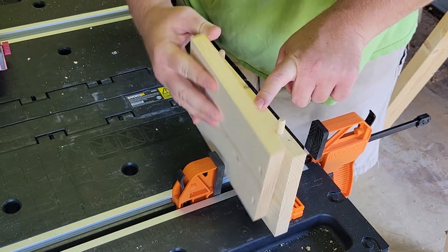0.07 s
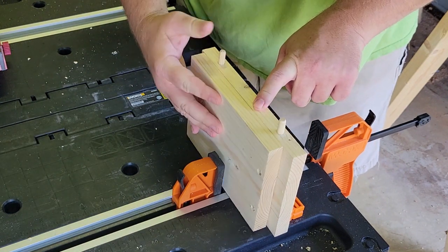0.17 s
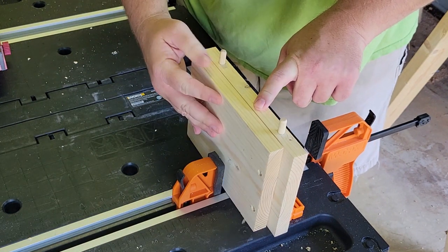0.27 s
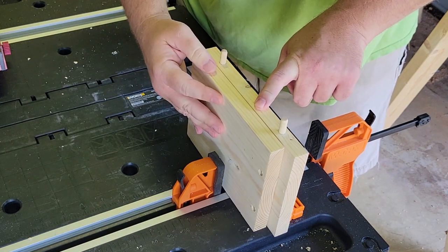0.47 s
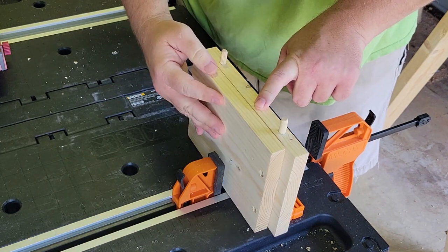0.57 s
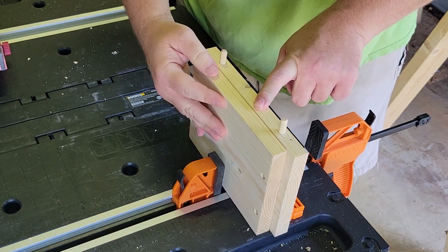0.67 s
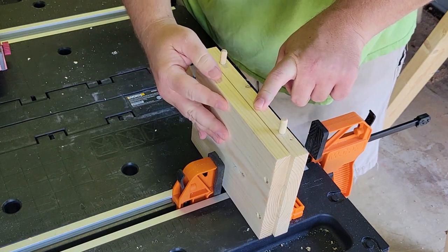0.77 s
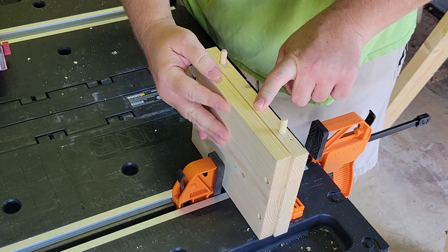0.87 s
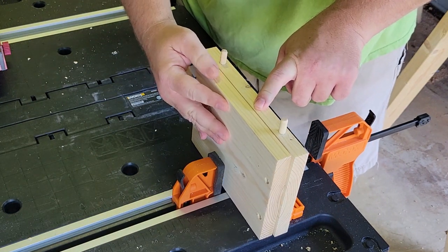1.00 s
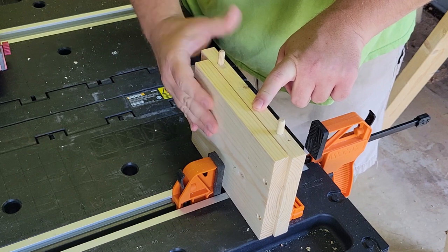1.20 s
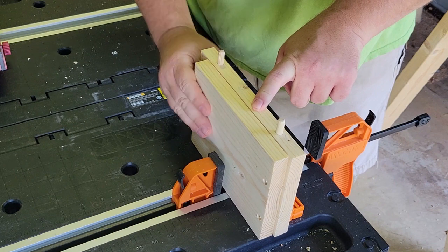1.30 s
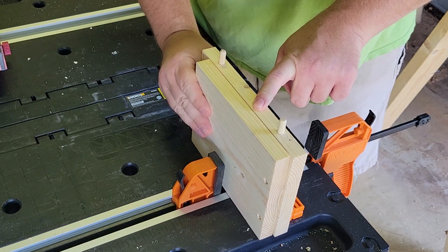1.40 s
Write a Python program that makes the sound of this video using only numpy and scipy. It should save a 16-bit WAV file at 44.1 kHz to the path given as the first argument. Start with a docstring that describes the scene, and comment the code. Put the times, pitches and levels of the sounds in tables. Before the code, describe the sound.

Wood knocks dully on wood after a short dry slide, in a small workshop.

```python
"""Ventilation rumbles and hisses faintly; a soft bump, then a wooden board slides down the face of a second
board clamped on a plastic work table. It taps lightly, knocks down on one corner, lands flat with a duller,
heavier knock and settles; fingers brush the wood later. Knocks are minimum-phase pulses, grit bursts and
decaying sines; friction and air are shaped noise; echoes and a diffuse noise tail make the small workshop."""
import sys
import numpy as np
from scipy import signal
from scipy.fft import rfft, irfft
from scipy.io import wavfile
from scipy.ndimage import uniform_filter1d

SR = 44100
rng = np.random.default_rng(int(sys.argv[2]) if len(sys.argv) > 2 else 0)


def log_audio(samples):
    """Write samples as a 16-bit WAV file to the path given in sys.argv[1]."""
    # one column per channel
    frames = np.atleast_2d(samples).T
    # limit to full scale, then quantise
    limited = np.clip(frames, -1, 1)
    pcm = np.round(limited * 32767).astype(np.int16)
    wavfile.write(sys.argv[1], SR, pcm)


N = 63945
TIME, FREQ = np.arange(N) / SR, np.fft.rfftfreq(N, 1 / SR)

# Spectrum of the dead knock of wood on wood. Each row: frequency in Hz, relative level in dB.
BLOW_COLOUR = [(22, -9.5), (60, 5), (130, 13), (200, 24), (310, 28), (480, 29.5), (700, 27.5), (1100, 20),
               (1750, 11.5), (2400, 7.5), (3100, 6), (3900, -1.5), (5600, -11.5), (8000, -26.5),
               (15500, -28)]
# Modes of the boards and the table. Each row: frequency in Hz, relative level in dB, T60 in seconds.
WOOD_MODES = [(88.16, -29.5, .3), (118, -32.5, 0.38), (175, -30, 0.22), (186, -32, 0.29), (213.6, -35, .45),
              (287, -19, .44), (344, -21, .38), (460, -22, .42), (418, -29, .3), (565, -31, .28),
              (607, -30, .2), (662, -26, .26), (682, -26, .26), (778, -26, .18), (834, -27, .16),
              (899, -35, .25), (1037, -28, .16), (1150, -31, .22), (1355, -30, .24), (1492, -35, .2),
              (2558, -32.5, .12), (3264, -33, 0.0847), (274.5, -23.5, 0.23)]
# Stereo likeness of diffuse sound. Each row: frequency in Hz, left-right correlation (no unit).
DIFFUSE_LIKENESS = [(100, .97), (300, .95), (650, .87), (1200, .35), (2500, .05), (12000, .15)]


def amp(db):
    """Decibels to gain."""
    return 10 ** (np.asarray(db) / 20)


def unit(x):
    """Scales to rms 1."""
    return x / np.sqrt(np.mean(x ** 2) + 1e-20)


def read(points, hz):
    """Interpolates a table on a log-frequency axis."""
    f, value = np.transpose(points)
    return np.interp(np.log(hz + 1), np.log(f), value)


def delayed(x, delay_s):
    """Shifts x later by delay_s, cut to the scene length."""
    pad = np.zeros(x.shape[:-1] + (max(round(delay_s * SR), 0),))
    return np.concatenate([pad, x], axis=-1)[..., :N]


def smooth_noise(window_samples):
    """Slow random curve of rms 1: white noise under a moving average."""
    return unit(uniform_filter1d(rng.standard_normal(N), window_samples))


def noise(gain, likeness):
    """Stereo noise of rms 1 with a given spectrum; mid and side weights set its left-right correlation."""
    mid, side = rfft(rng.standard_normal((2, N)))
    same = np.clip(read(likeness, FREQ), -1, 1)
    mid = mid * np.sqrt(1 + same)
    side = side * np.sqrt(1 - same)
    return unit(irfft(np.array([mid + side, mid - side]) * gain, N))


def click(spectrum_db):
    """Minimum-phase pulse: folding the cepstrum packs the energy as early as the spectrum allows."""
    cepstrum = irfft(np.log(amp(spectrum_db)), N)
    cepstrum[1:] *= 2
    cepstrum[N // 2:] = 0
    return irfft(np.exp(rfft(cepstrum)), N)


def decay(time_s, t60_s):
    """Exponential decay, 60 dB down after t60_s."""
    return np.exp(-np.log(1000) * time_s / t60_s)


def ventilation():
    """A sine hum of wavering pitch in a narrow band of rumble, under broadband hiss."""
    # Hiss spectrum. Each row: frequency in Hz, relative level in dB.
    air_colour = [(20, -28.5), (40, -11.5), (60, -12.5), (110, -10), (160, -22.5), (220, -22.5), (400, -28),
                  (550, -28), (1150, -26.5), (1500, -31.5), (2300, -35), (2850, -29), (3700, -39),
                  (4700, -42.5), (6200, -38.5), (7000, -35.5), (7750, -29.5), (8500, -48.5), (10000, -58.5),
                  (16000, -57)]
    # Stereo likeness. Each row: frequency in Hz, left-right correlation (no unit).
    air_likeness = [(130, 0.96), (290, 0.74), (640, .4), (1400, -0.26), (3100, -.1), (6800, 0.28),
                    (9000, .7), (15000, 0.61)]
    rumble_hz, half_width_hz = 77, 18
    waver_rms_hz, waver_window_s = 1.2, 0.061
    hum_db, rumble_db, hiss_db = -52.5, -54, -55

    hz = rumble_hz + waver_rms_hz * smooth_noise(int(waver_window_s * SR))
    hum = np.sin(2 * np.pi * np.cumsum(hz) / SR)
    rumble = noise(1 / (1 + ((FREQ - rumble_hz) / half_width_hz) ** 2), air_likeness)
    hiss = noise(amp(read(air_colour, FREQ)), air_likeness)
    return amp(hum_db) * hum + amp(rumble_db) * rumble + amp(hiss_db) * hiss


def handling():
    """A soft bump: a decaying sine at the strongest mode's frequency, with a short dull scuff of noise."""
    start_s, rise_s, t60_s = 0.003, 0.0017, 0.27
    level_db, scuff_re_sine_db = -39, -8.5

    hz = max(WOOD_MODES, key=lambda row: row[1])[0]
    age_s = np.maximum(TIME - start_s, 0)
    # Half the blow's dB contour, with the treble rolled off
    colour = amp(read(BLOW_COLOUR, FREQ) / 2) / (1 + (FREQ / 6000) ** 4)
    scuff = amp(scuff_re_sine_db) * noise(colour, DIFFUSE_LIKENESS)
    envelope = np.minimum(age_s / rise_s, 1) * decay(age_s, t60_s)
    return amp(level_db) * envelope * (np.sin(2 * np.pi * hz * age_s) + scuff)


def rubbing():
    """Friction: grainy resonant hiss of board on board and of fingers on wood, with a dull body for fingers."""
    # Board sliding on board. Each row: time in seconds, hiss level in dB.
    slide_levels = [(0, -55), (.045, -63), (.085, -50), (.12, -47.5), (.165, -45), (.205, -48), (.26, -58),
                    (.29, -70)]
    # Hiss spectrum. Each row: frequency in Hz, relative level in dB.
    rub_colour = [(100, -13.5), (400, 3), (650, -7), (900, 4), (1400, -7.5), (3000, 0), (4500, -4.5),
                  (7500, -7), (10000, -6.5), (11300, -15), (12500, -11.5), (15500, -10.5)]
    # Resonances woken by rubbing. Each row: frequency in Hz, width in Hz, boost in dB.
    rub_peaks = [(1040, 60, 9), (1850, 150, 9), (2690, 80, 11), (2950, 100, 13), (5240, 90, 15),
                 (5950, 180, 10), (8970, 250, 6)]
    # Fingers shift their grip. Each row: centre in seconds, 1/e half length in seconds,
    # hiss level in dB, dull body level in dB.
    finger_strokes = [(0.66, .06, -84, -58.5), (0.835, 0.08, -66.5, -59), (1.412, 0.077, -68.5, -89)]
    grain_rms_db, grain_window_s = 1.5, 0.0022
    body_hz, body_half_width_hz = 212, 200

    colour_db = read(rub_colour, FREQ)
    for hz, width_hz, boost_db in rub_peaks:
        colour_db = colour_db + boost_db / (1 + (2 * (FREQ - hz) / width_hz) ** 2)
    grain = smooth_noise(max(int(grain_window_s * SR), 1))
    # Silent after the last slide row
    hiss_gain = amp(np.interp(TIME, *np.transpose(slide_levels), right=-np.inf))
    body_gain = np.zeros(N)
    for centre_s, half_s, hiss_db, body_db in finger_strokes:
        stroke = np.exp(-((TIME - centre_s) / half_s) ** 2)
        hiss_gain = hiss_gain + amp(hiss_db) * stroke
        body_gain = body_gain + amp(body_db) * stroke
    body = noise(1 / (1 + ((FREQ - body_hz) / body_half_width_hz) ** 2), DIFFUSE_LIKENESS)
    hiss = amp(grain_rms_db * grain) * noise(amp(colour_db), DIFFUSE_LIKENESS)
    return hiss_gain * hiss + body_gain * body


def echoes(x):
    """Direct sound plus single reflections from the table and near things."""
    # Each row: left delay in seconds, right delay in seconds, level in dB.
    reflections = [(.0027, 0.0027, -21.5), (.0060, 0.0079, -12), (.0087, .0085, -17), (.0142, .0145, -17),
                   (0.018, 0.015, -13)]
    total = x
    for left_s, right_s, db in reflections:
        total = total + amp(db) * np.array([delayed(x, left_s), delayed(x, right_s)])
    return total


def workshop(x):
    """Diffuse room: convolution with a noise tail of evened colour, each band dying at its own speed."""
    # Decay. Each row: frequency in Hz, T60 in seconds.
    room_t60 = [(80, .5), (250, .48), (500, .43), (1000, .41), (3000, .39), (7000, .39), (10000, .32),
                (14000, .27)]
    # Tail spectrum. Each row: frequency in Hz, level in dB.
    room_colour = [(60, 2), (170, 4), (300, 2), (600, -2), (1200, 2), (2500, 1), (6000, 4), (14000, 4)]
    delay_s, build_s, even_hz = 0.0011, 0.005, 14

    hz, frame_s, z = signal.stft(noise(1, DIFFUSE_LIKENESS), SR, nperseg=512)
    z = z * decay(frame_s, read(room_t60, hz)[:, None])
    spectrum = rfft(signal.istft(z, SR, nperseg=512)[1][:, :N])
    # Even out the power in even_hz bands before colouring
    power = uniform_filter1d((abs(spectrum) ** 2).mean(0), max(int(even_hz * N / SR), 1))
    tail = irfft(spectrum / np.sqrt(power) * amp(read(room_colour, FREQ)), N)
    tail *= np.clip((TIME - delay_s) / build_s, 0, 1)
    tail *= TIME < TIME[-1] / 2
    return signal.fftconvolve(x[None], tail, axes=1)[:, :N]


def bass(hz, db):
    """Bass shelf of one contact: lifts or lowers the lows of its knock."""
    return db / (1 + (hz / 520) ** 2)


def crunch():
    """Grit as two rough faces meet: a brief noise burst with the energy of a pulse of the same spectrum."""
    # Spectrum. Each row: frequency in Hz, relative level in dB.
    crunch_colour = [(200, -29), (1000, -4.5), (2000, 9), (3100, 9), (3900, 0), (5600, -1), (8000, -9.5),
                     (10000, -10), (11500, -16.5), (15500, -16)]
    # Stereo likeness. Each row: frequency in Hz, left-right correlation (no unit).
    crunch_likeness = [(1000, 0.71), (3000, .5), (12000, .55)]
    rise_s, fade_s = 0.0006, 0.0048

    burst = np.minimum(TIME / rise_s, 1) * np.exp(-TIME / fade_s)
    grit = amp(read(crunch_colour, FREQ))
    gain = np.sqrt(np.mean(grit ** 2) / np.sum(burst ** 2))
    return burst * gain * noise(grit, crunch_likeness)


def mode(hz, db, t60_s):
    """One dying vibration: a sine under exponential decay."""
    return amp(db) * decay(TIME, t60_s) * np.sin(2 * np.pi * hz * TIME)


def tap():
    """The edge touches lightly just before landing: one short, higher note on a faint blow and crunch."""
    start_s, note_hz, note_db, note_t60_s = 0.1977, 1250, -27, 0.013
    blow_db, crunch_db = -34.5, -21

    note = mode(note_hz, note_db, note_t60_s)
    blow = click(blow_db + read(BLOW_COLOUR, FREQ))
    return delayed(note + blow + amp(crunch_db) * crunch(), start_s)


def knocks():
    """Each contact gives a dead blow and a brief crunch, and sets the modes ringing."""
    # Contacts of the board. Each row: start in seconds, force in dB, bass lift in dB,
    # crunch in dB re force, ring in dB re force.
    contacts = [(0.2142, -5, 5, 2, -7.5), (0.2170, -11.5, -5, 7.5, -15), (0.2669, 0.5, -0.5, -5, 1),
                (0.2756, -15, 2, 6, -14.5), (0.3059, -14, 4.5, 5, -9)]
    ring_rise_s = 0.002

    blows, rings, crunches = np.zeros(N), np.zeros(N), np.zeros((2, N))
    # Successive table rows start with opposite sign
    bank = np.array([(-1) ** k * mode(*row) for k, row in enumerate(WOOD_MODES)])
    bank = bank * np.minimum(TIME / ring_rise_s, 1)
    modes_hz = np.array(WOOD_MODES)[:, 0]
    colour_db = read(BLOW_COLOUR, FREQ)
    for start_s, force_db, bass_db, crunch_db, ring_db in contacts:
        blows -= delayed(click(force_db + colour_db + bass(FREQ, bass_db)), start_s)
        crunches += amp(force_db + crunch_db) * delayed(crunch(), start_s)
        mode_gains = amp(force_db + ring_db + bass(modes_hz, bass_db))
        rings += delayed((mode_gains[:, None] * bank).sum(0), start_s)
    return blows, rings, crunches


def scene():
    """The tap and the knocks in the room, with friction, handling and ventilation."""
    ring_send_db, crunch_send_db, tap_send_db = -21.5, -1.5, 4

    blows, rings, crunches = knocks()
    touch = tap()
    room_send = blows + amp(ring_send_db) * rings
    room_send = room_send + amp(crunch_send_db) * crunches[0] + amp(tap_send_db) * touch[0]
    impacts = echoes(blows) + rings + crunches + touch
    return impacts + workshop(room_send) + rubbing() + handling() + ventilation()


def record(dry):
    """Treble tilted to the left microphone, a low cut, then a linear-phase band limit."""
    treble_left_db, treble_hz = 1.9, 14000.0
    low_cut_hz, edge_hz = 27.4, 15900

    lean_db = treble_left_db * FREQ ** 4 / (FREQ ** 4 + treble_hz ** 4)
    x = irfft(rfft(dry) * amp([lean_db, -lean_db]), N)
    x = signal.sosfilt(signal.butter(2, low_cut_hz, "high", fs=SR, output="sos"), x)
    band_limit = signal.firwin(401, edge_hz, window=("kaiser", 9), fs=SR)
    return signal.oaconvolve(x, band_limit[None], "same")


dry = scene()
out = record(dry)
log_audio(out)
```